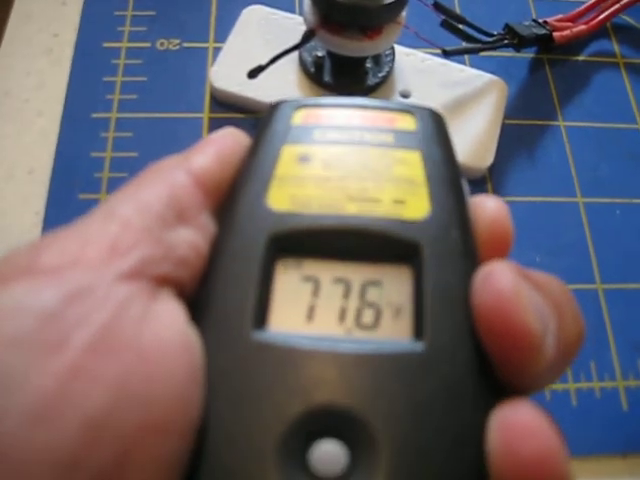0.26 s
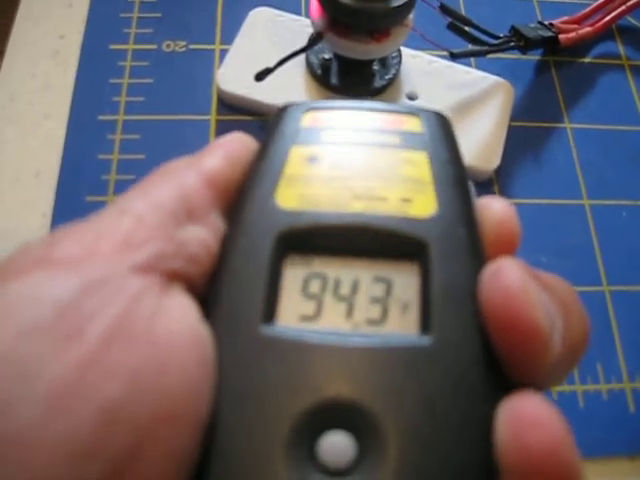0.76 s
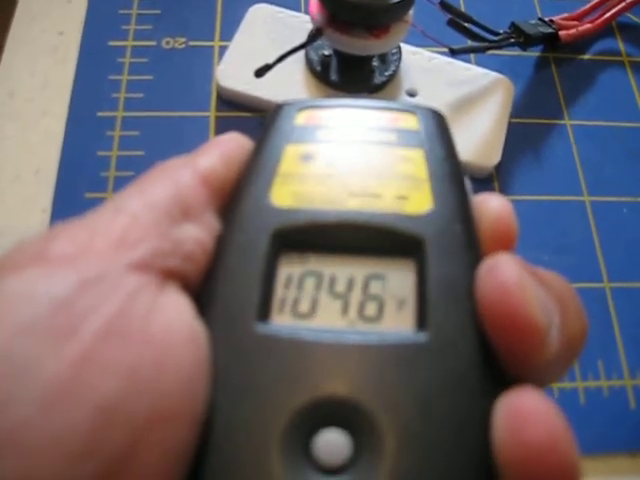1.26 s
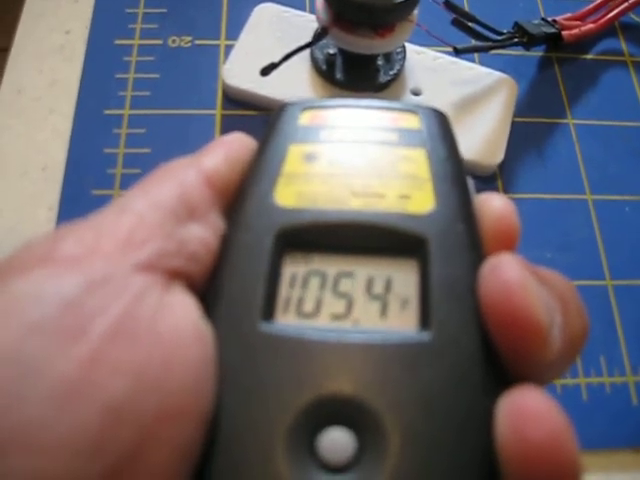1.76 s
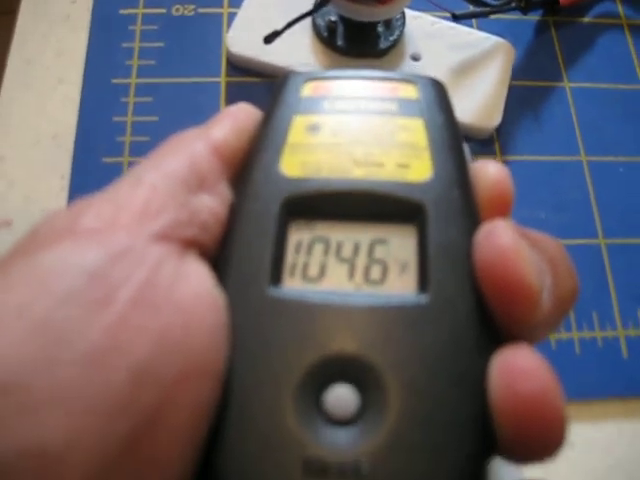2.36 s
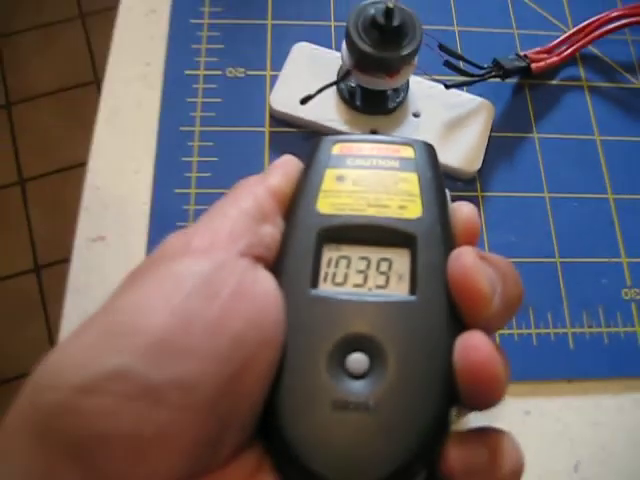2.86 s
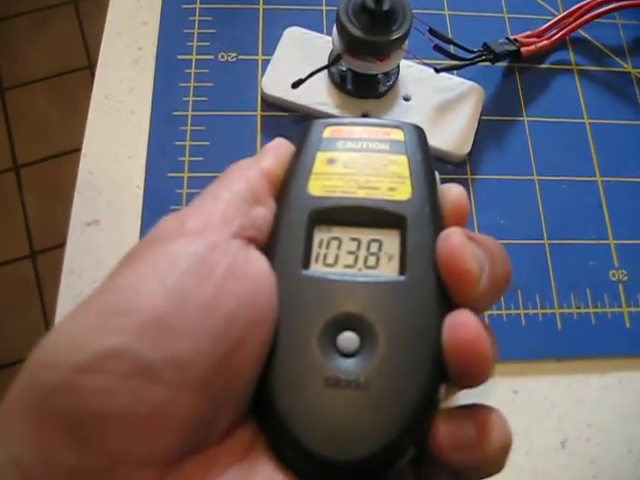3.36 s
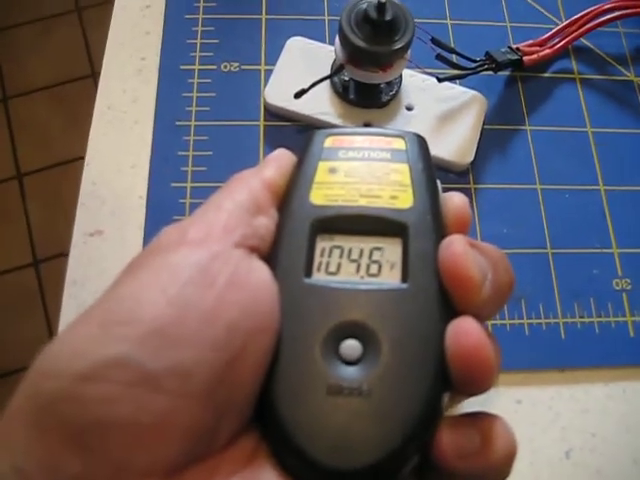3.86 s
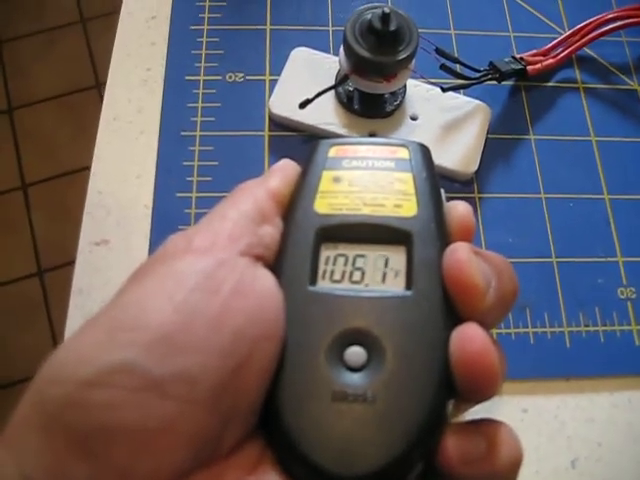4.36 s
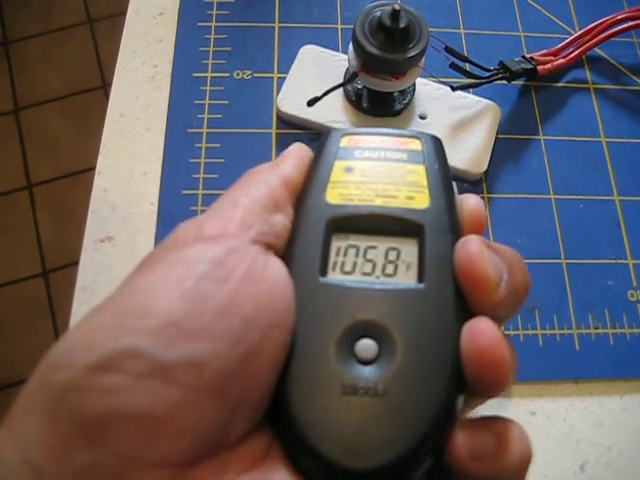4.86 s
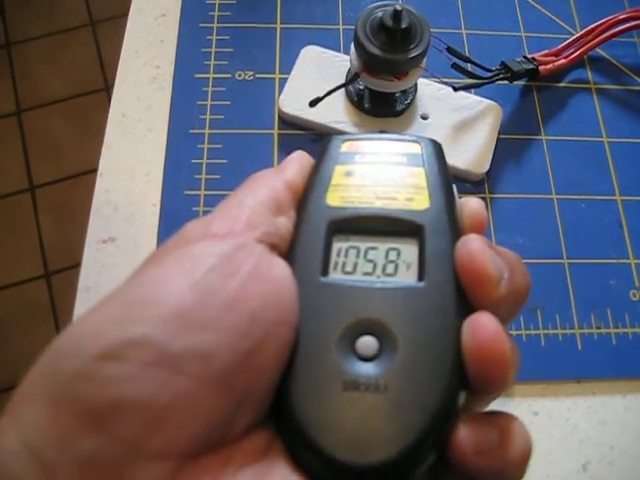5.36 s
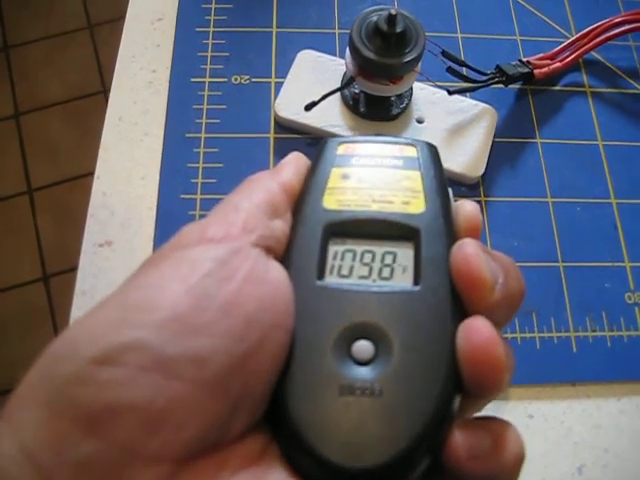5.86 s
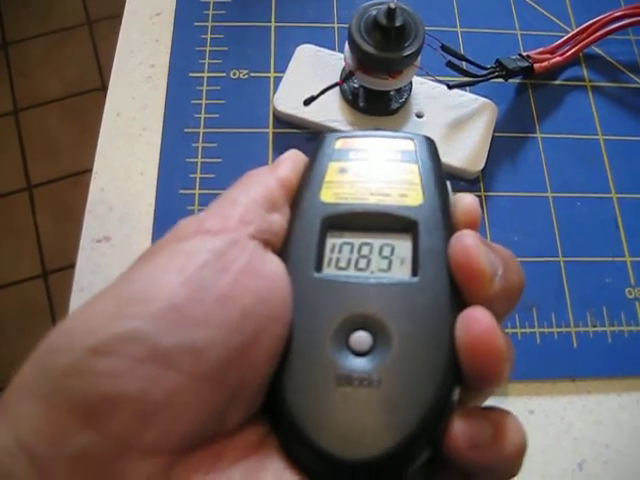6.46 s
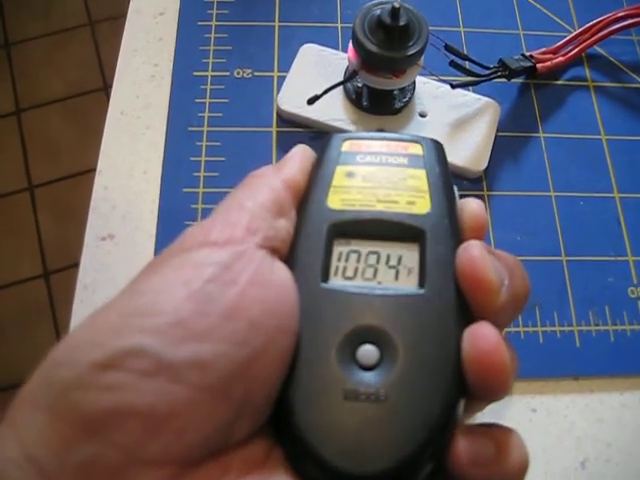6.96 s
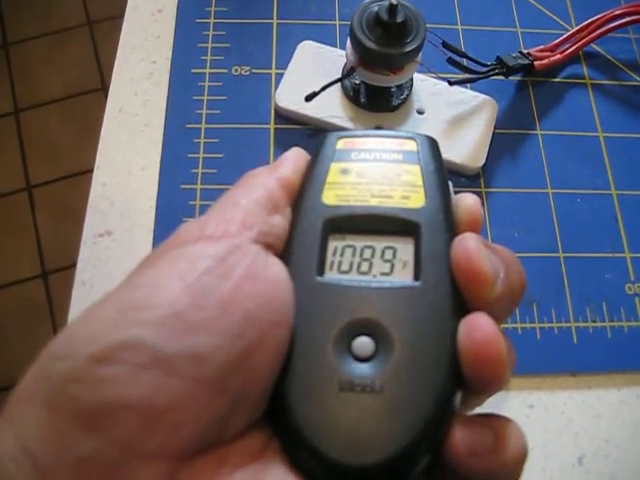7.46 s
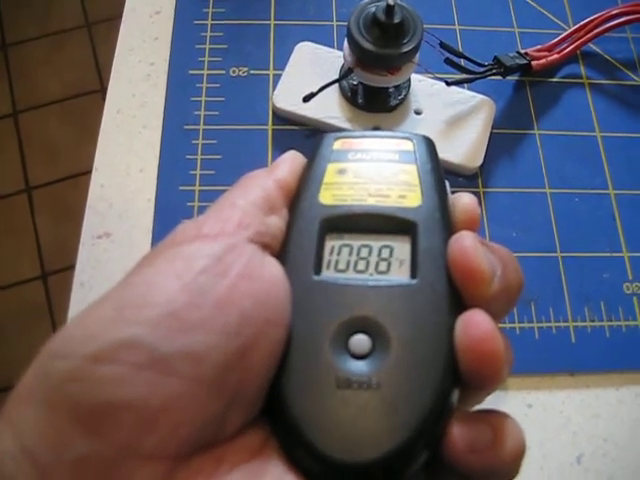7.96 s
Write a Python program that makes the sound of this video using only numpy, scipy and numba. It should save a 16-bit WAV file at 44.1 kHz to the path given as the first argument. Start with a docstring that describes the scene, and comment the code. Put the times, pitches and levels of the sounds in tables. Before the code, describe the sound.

Close to the microphone, a small motor whirs without a break on a plastic block on a bench. A steady, high electrical whine sits over a fine, very fast rattle and a bright metallic hiss, with little bass. The pitch lifts very slightly and settles a few times, and the rattle shifts its tone a little partway through. Loudness stays even, and the room behind it is quiet.

```python
"""A small brushless motor spins on a plastic block on a workbench, heard close by in a quiet room.
From the start the rotor ticks and rattles in the same pattern every turn, made uneven by the bearing
balls; the shaft hums and the coils whine at the controller's switching rate. Twice in the first second
the speed jumps up and sags back. From about 2.5 to 3.8 s the listener backs away and the rattle changes
tone. Four more speed jumps follow, while the warming motor creeps a little faster."""
import sys
import numpy as np
from scipy import signal
from scipy.fft import rfft, irfft
from scipy.io import wavfile
from scipy.ndimage import uniform_filter1d
from numba import njit

SR = 44100
rng = np.random.default_rng(int(sys.argv[2]) if len(sys.argv) > 2 else 0)


def wav_record(signal):
    """Record a signal, one row per channel, as 16-bit PCM in the file named by sys.argv[1]."""
    frames = np.transpose(np.atleast_2d(signal))
    bounded = np.clip(frames, -1, 1)
    # unit amplitude maps onto the largest positive 16-bit level
    quanta = np.round(bounded * 32767).astype(np.int16)
    wavfile.write(sys.argv[1], SR, quanta)


N = 361619

# the shaft's settled speed, creeping up as the motor warms: (time [s], speed [Hz])
SHAFT_SPEED = [(0, 94.93), (1.3, 95.02), (2.15, 95.12), (2.3, 95.25), (3.0, 95.36), (3.85, 95.49),
               (4.5, 95.46), (4.9, 95.6), (6.3, 95.66), (6.8, 95.76), (8.2, 95.8)]
# brief jumps in speed: (peak time [s], jump [Hz])
SURGES = [(.04, 1.35), (.81, .85), (4.57, .82), (5.255, .8), (6.485, .85), (7.495, .87)]
# the listener's steps away: (middle time [s], top speed [m/s], length [s])
STEPS_BACK = [(2.66, .19, .4), (3.3, .28, .26), (3.64, .15, .17)]
# tone of the room noise: (frequency [Hz], gain [dB])
ROOM_COLOUR = [(15, -16), (40, -2), (100, -0.5), (300, -1.5), (600, -2.5), (1200, 2), (3000, -48)]
# bearing tones: (shaft multiple, added ball-pass multiple, early level [dB], middle [dB], late [dB])
BEARING_TONES = [(6, 1, -69, -70, -71), (16, -2, -74, -75, -75), (7, 1, -69, -70, -73),
                 (4, 2, -71, -71, -71), (15, -1, -70, -70, -70), (17, -1, -70, -70, -70),
                 (20, -1, -69, -69, -69), (24, -1, -54, -57, -58), (25, -1, -54, -58, -58),
                 (19, 1, -64, -64, -64), (30, -1, -57, -57, -57), (31, -1, -59, -59, -59),
                 (32, -1, -58, -58, -58), (33, -1, -53, -53, -53), (27, 1, -58, -58, -58),
                 (29, 1, -56, -56, -56), (37, -1, -55, -55, -55), (51, -1, -55, -55, -55),
                 (53, -1, -58, -58, -58), (45, -1, -60, -60, -62), (10, -1, -76, -76, -76),
                 (4, 1, -76, -76, -76), (11, -1, -74, -74, -74), (29, -1, -61, -61, -61),
                 (23, 1, -61, -61, -61), (61, -1, -56, -56, -54), (68, 1, -57, -57, -57)]
# coil tones: (switching multiple, added shaft multiple, early level [dB], middle [dB], late [dB])
COIL_TONES = [(1, -16, -51, -53, -51), (1, -8, -51, -49, -47), (1, -7, -55, -52, -50),
              (1, -6, -46, -52, -51), (1, -5, -52, -55, -57), (1, -4, -62, -66, -68), (1, 0, -45, -44, -44),
              (1, 2, -60, -63, -61), (1, 3, -57, -69, -77), (1, 4, -62, -54, -59), (1, 5, -56, -55, -53),
              (1, 6, -40, -43, -43), (1, 7, -54, -58, -60), (1, 8, -37, -36, -38), (1, 16, -44, -44, -44),
              (1, 24, -48, -48, -48), (2, -16, -53, -55, -54), (2, -8, -43, -43, -44),
              (2, -6, -49, -50, -49)]
# shaft tones: (shaft multiple, early level [dB], middle [dB], late [dB], change in a surge [dB/Hz])
SHAFT_TONES = [(2, -59, -60, -61, -6), (3, -68, -65, -65, 2), (4, -59, -59, -55, 2),
               (5, -68, -66, -68, -17), (6, -70, -76, -85, -2), (7, -52, -54, -55, -1),
               (8, -58, -61, -64, -9), (9, -57, -58, -59, -1), (10, -66, -64, -71, -7),
               (11, -62, -57, -61, -3), (12, -60, -64, -59, 3), (13, -57, -60, -61, 1),
               (14, -57, -58, -60, 0), (15, -56, -56, -54, 2), (16, -61, -69, -60, 6),
               (17, -65, -63, -59, 2), (18, -75, -75, -72, -3), (19, -61, -71, -59, -1),
               (20, -57, -73, -61, 7), (21, -61, -58, -56, 3), (22, -55, -58, -49, -4),
               (23, -67, -62, -64, 13), (24, -46, -42.5, -48, 1), (25, -67, -63, -53, 1),
               (26, -66, -64, -59, -2), (27, -53, -55, -48, 1), (28, -47, -48, -48, 0),
               (29, -49, -51, -55, 0), (30, -47, -47, -50, -2), (31, -55, -66, -49, 0),
               (32, -51, -60, -51, -4), (33, -54, -51, -50, -7), (34, -51, -57, -56, -2),
               (35, -56, -49, -51, -8), (36, -50, -46, -50, -1), (37, -58, -64, -55, 0),
               (38, -52, -54, -48, -1), (39, -50, -57, -57, -10), (40, -56, -53, -52, -6),
               (41, -51, -53, -55, -5), (42, -56, -61, -55, -5), (43, -54, -56, -57, -7),
               (44, -54, -54, -59, 1), (45, -66, -64, -60, 5), (46, -65, -63, -54, 2),
               (47, -57, -54, -52, 1), (48, -53, -61, -61, 1), (49, -56, -57, -58, -4),
               (50, -57, -58, -57, 3), (51, -60, -64, -60, 4), (52, -60, -54, -59, 2),
               (53, -54, -53, -60, 1), (54, -54, -50, -52, -4), (55, -63, -57, -59, 0),
               (56, -64, -51, -55, -1), (57, -63, -63, -60, 2)]
# the knocks in one turn: (angle [turns], sharp tick strength [dB], dull rattle strength [dB])
KNOCKS = [(.085, 2.5, -4), (.21, 0, -8), (.27, -17.5, -1), (.335, -0.5, -6), (.41, -4, -6),
          (.46, -0.5, -9.5), (0.519, -1.5, -2.5), (.62, -4, -16), (.72, -25, -8.5), (.84, -2.5, -9.5),
          (.965, -1, -2)]
# how the knocking swells and fades: (time [s], rattle gain [dB], tick gain [dB])
KNOCK_GAINS = [(0.0, -30, -25), (0.04, -32, -29), (0.09, -31.5, -28), (1.12, -31, -29), (1.92, -32, -28),
               (2.21, -32, -30), (2.33, -30, -27.5), (2.4, -33, -29), (2.78, -31.5, -28.5),
               (7.72, -30.5, -28.5), (8.11, -30.5, -28.5), (8.2, -29.5, -29)]
# tone of the block and bench: (frequency [Hz], gain from near [dB], gain from far [dB])
BLOCK_COLOUR = [(500, -40, -29), (970, -27.5, -21.5), (1630, -19, -15), (1900, -13, -14),
                (2340, -11.5, -7.5), (2860, -8, -4.5), (3190, -3.5, -1), (3580, -8, -7), (4610, -5, -2.5),
                (4550, -2, 1.5), (5000, -0.5, 2), (5160, -5, 1), (5655, -2.5, 1.5), (5680, -6, -0.5),
                (6870, -29.5, -28)]
# tone of the bell, the rotor's thin cup: (frequency [Hz], gain [dB])
BELL_COLOUR = [(5000, -34), (6250, -19), (6750, -9.5), (7120, -15), (7400, -10.5), (8300, -17), (9000, -6),
               (10300, -1), (11200, -3.5), (12200, -9), (13200, -12), (14500, -9.5), (16000, -13.5)]

STAGES_S = (2.3, 3.0, 4.52, 4.6)  # early levels end, middle ones start, middle ones end, late ones start
BACKING_S = (2.46, 3.8)  # the listener backs away between these times
BALL_PASS = 3.228  # balls passing one spot of the bearing's outer ring per turn
SWITCH_HZ, SWITCH_SAG_HZ_PER_S = 8020.3, .45  # the controller's switching rate and its slow fall
HOP = 64  # samples between updates of slow changes


def undb(db):
    """Turns decibels into a plain gain."""
    return 10 ** (np.asarray(db) / 20)


def level(x, db):
    """Scales x to an average (rms) level."""
    return x * undb(db) / np.sqrt(np.mean(x ** 2))


def colour(x, table, size=4096):
    """Filters x along a curve of (frequency [Hz], gain [dB]) points."""
    hz, db = np.transpose(table)
    log_hz = np.log(np.maximum(np.arange(size // 2 + 1) * SR / size, 1))
    gain = undb(np.interp(log_hz, np.log(hz), db, right=db[-1] - 20.0))
    cepstrum = irfft(np.log(gain))
    cepstrum[1:size // 2] *= 2  # folded in half, so the filter rings only after a hit
    cepstrum[size // 2 + 1:] = 0
    return signal.oaconvolve(x, irfft(np.exp(rfft(cepstrum))))[:N]


def wander(rate_hz):
    """A smooth random wiggle about 1 in size, one value per hop."""
    hold, size = int(SR / HOP / rate_hz), N // HOP + 1
    steps = np.repeat(rng.standard_normal(size // hold + 1), hold)
    return 1.3 * uniform_filter1d(uniform_filter1d(steps, hold), hold)[:size]


@njit
def sines(first, second, by_first, by_second, start, gain, hop):
    """Adds up sine waves whose phases are multiples of two running cycle counts."""
    out = np.zeros(len(first))
    for j in range(len(start)):
        for a in range(0, len(first) - 1, hop):
            b = min(a + hop, len(first) - 1)
            phase = 2 * np.pi * (by_first[j] * first[a] + by_second[j] * second[a])
            step = (2 * np.pi * (by_first[j] * first[b] + by_second[j] * second[b]) - phase) / (b - a)
            now, last = np.cos(phase + start[j]), np.cos(phase + start[j] - step)
            feedback, size = 2 * np.cos(step), gain[j, a // hop]
            for i in range(a, b):
                out[i] += size * now
                now, last = feedback * now - last, now  # each sample follows from the last two
    return out


def tones(first, second, multiples, start, stages_db, swing_db, waver_db):
    """Tones that move through their early, middle and late levels, wavering a little."""
    time = np.arange(N // HOP + 1) * HOP / SR
    db = np.array([np.interp(time, STAGES_S, row[[0, 1, 1, 2]]) + waver_db * wander(8)
                   for row in stages_db])
    by_first, by_second = np.round(multiples)
    return sines(first, second, by_first, by_second, start, np.sqrt(2) * undb(db + swing_db), HOP)


def beat_tones(table, first, second, waver_db):
    """Two cycles acting together make tones at sums and differences of their rates."""
    table = np.array(table, float)
    start = 2 * np.pi * rng.random(len(table))
    return tones(first, second, table[:, :2].T.copy(), start, table[:, 2:], 0, waver_db)


def doppler(time, sound_m_s=343):
    """Pitch ratio: each step away from the motor lowers its pitch for a moment."""
    middle, speed, length = np.transpose(STEPS_BACK)[:, :, None]
    away = speed * np.cos(np.pi * np.clip((time - middle) / length, -.5, .5)) ** 2
    return 1 - away.sum(axis=0) / sound_m_s


def surges(time, rise_s=.06, sag_s=.165):
    """Extra shaft speed in Hz: each surge rises quickly and sags back."""
    peak, jump = np.transpose(SURGES)[:, :, None]
    rise = np.sin(np.pi / 2 * np.clip(1 + (time - peak) / rise_s, 0, 1)) ** 2
    sag = np.exp(-np.maximum(time - peak, 0) / sag_s)
    return (jump * rise * sag).sum(axis=0)


def room_noise():
    """The room is a faint, steady, low rush."""
    return level(colour(rng.standard_normal(N), ROOM_COLOUR), db=-61)


def bearing_tones(turns):
    """The passing balls beat with the turning shaft and make faint tones."""
    return beat_tones(BEARING_TONES, turns, BALL_PASS * turns, waver_db=3.0)


def coil_whine(switch_cycles, turns):
    """The switched current makes the coils whine; the turning shaft adds tones on either side."""
    return beat_tones(COIL_TONES, switch_cycles, turns, waver_db=1.1)


def shaft_hum(turns, surge_hz, thump_turns=.45, thump_centre=13.27, thump_span=4.3):
    """Knocks and the off-balance rotor's thump repeat each turn as tones; their angles set the phases."""
    table = np.array(SHAFT_TONES)
    multiple = table[:, 0]
    angle, _, knock_db = np.transpose(KNOCKS)
    offset = (multiple - thump_centre) / thump_span  # the thump rules the multiples near its centre
    bench_smear = 0.441 * offset ** 2
    thump = 6.7 * np.exp(-offset ** 2 - 2j * np.pi * (multiple * thump_turns + bench_smear))
    start = np.angle(np.exp(-2j * np.pi * np.outer(multiple, angle)) @ undb(knock_db) + thump)
    swing_db = np.outer(table[:, 4], surge_hz[::HOP])  # a surge crosses narrow resonances
    return tones(turns, turns, [multiple, 0 * multiple], start, table[:, 1:4], swing_db, waver_db=0.7)


def knocks(turns, column, scatter_db, ball_db, jitter_turns, burst_s, rub_db):
    """Noise bursts at set rotor angles, varied by chance and by the passing balls, over steady rubbing."""
    table = np.array(KNOCKS)
    at_turn = np.arange(int(turns[-1]))[:, None] + table[:, 0]
    chance = 2 * rng.random(at_turn.shape + (2,)) - 1
    ball_swing_db = ball_db * np.cos(2 * np.pi * BALL_PASS * at_turn)
    db = table[:, column] + scatter_db * chance[..., 0] + ball_swing_db
    place = np.searchsorted(turns, at_turn + jitter_turns * chance[..., 1]).clip(0, N - 1)
    force = np.bincount(place.ravel(), undb(db).ravel(), N)
    burst = np.exp(-.5 * (np.arange(-200, 201) / SR / burst_s) ** 2)
    return (signal.oaconvolve(force, burst, "same") + undb(rub_db)) * rng.standard_normal(N)


def ball_clicks(turns, ball_db):
    """Knocks land harder or softer by where the balls are; these clicks carry just that change."""
    table = np.array(KNOCKS)
    at_turn = np.arange(int(turns[-1]) - 1)[:, None] + table[:, 0]
    load = undb(ball_db * np.cos(2 * np.pi * BALL_PASS * at_turn))
    size = (undb(table[:, 2]) * (load - load.mean())).ravel()
    place = np.interp(at_turn.ravel(), turns, np.arange(N))
    sample = place.astype(int)
    share = place - sample  # each click is split between two samples
    return np.bincount(sample, size * (1 - share), N) + np.bincount(sample + 1, size * share, N)


def treble_dip(hiss, hz=7872, width_hz=940, floor_db=-30):
    """Filters a narrow dip near 7.9 kHz into the hiss of the rattle and ticks."""
    dipped = signal.lfilter(*signal.iirnotch(hz, hz / width_hz, SR), hiss)
    return dipped + undb(floor_db) * (hiss - dipped)


def shell_ring(time, hz=4974, width_hz=30):
    """The motor's shell rings at one pitch, fading as the listener backs away."""
    ring = signal.lfilter(*signal.iirpeak(hz, hz / width_hz, SR), rng.standard_normal(N))
    return level(ring, 0) * undb(np.interp(time, BACKING_S, (-14, -20)))


def block_rattle(time, turns):
    """Dull knocks shake the block and bench; their tone shifts as the listener backs away."""
    rattle = knocks(turns, column=2, scatter_db=2, ball_db=-2, jitter_turns=.015,
                    burst_s=.00014, rub_db=-4)
    blows = level(rattle, 6) + level(ball_clicks(turns, ball_db=-3), -4)
    near, far = (level(colour(blows, np.array(BLOCK_COLOUR)[:, [0, k]]), -2.49) for k in (1, 2))
    away = np.interp(time, BACKING_S, (0, 1))
    return (1 - away) * near + away * far


def bell_ticks(turns):
    """Sharp ticks make the rotor's thin bell ring brightly."""
    ticks = knocks(turns, column=1, scatter_db=4.5, ball_db=2, jitter_turns=.0036,
                   burst_s=.0001, rub_db=-14.5)
    return level(colour(ticks, BELL_COLOUR), 0.87)


def scene():
    """Counts the shaft's turns, drives the motor's sounds from them and adds the room."""
    time = np.arange(N) / SR
    surge_hz, pitch_ratio = surges(time), doppler(time)
    wobble_hz = .03 * np.repeat(wander(12), HOP)[:N]
    shaft_hz = np.interp(time, *np.transpose(SHAFT_SPEED)) + surge_hz + wobble_hz
    turns = np.cumsum(shaft_hz * pitch_ratio) / SR
    switch_cycles = np.cumsum((SWITCH_HZ - SWITCH_SAG_HZ_PER_S * time) * pitch_ratio) / SR
    gain_times, rattle_db, tick_db = np.transpose(KNOCK_GAINS)
    # the loose block chatters on the bench, so rattle and ticks flutter together
    chatter = np.repeat(wander(35), HOP)[:N]
    rattle_gain = undb(np.interp(time, gain_times, rattle_db) + 0.71 * chatter)
    tick_gain = undb(np.interp(time, gain_times, tick_db) + 0.26 * chatter)
    rattle = (block_rattle(time, turns) + shell_ring(time)) * rattle_gain
    ticks = bell_ticks(turns) * tick_gain
    background = bearing_tones(turns) + coil_whine(switch_cycles, turns) + room_noise()
    return (background + shaft_hum(turns, surge_hz) + treble_dip(rattle + ticks))[None]


def record(dry):
    """Cuts the highest treble steeply."""
    top_hz = 15740
    return signal.sosfilt(signal.ellip(14, .3, 75, top_hz, fs=SR, output="sos"), dry)


dry = scene()
out = record(dry)
wav_record(out)
```